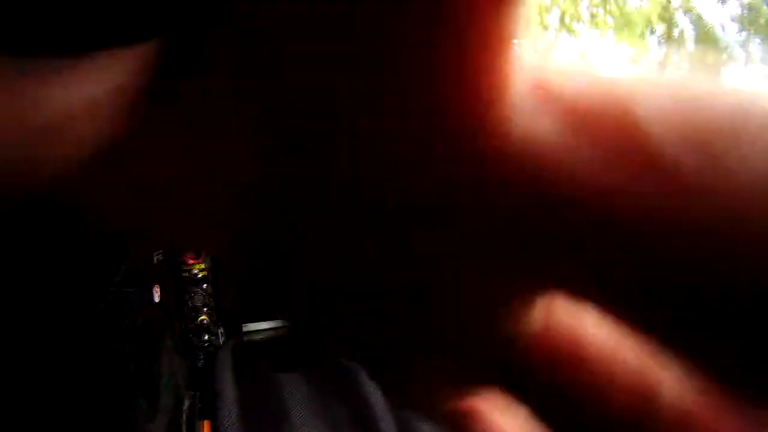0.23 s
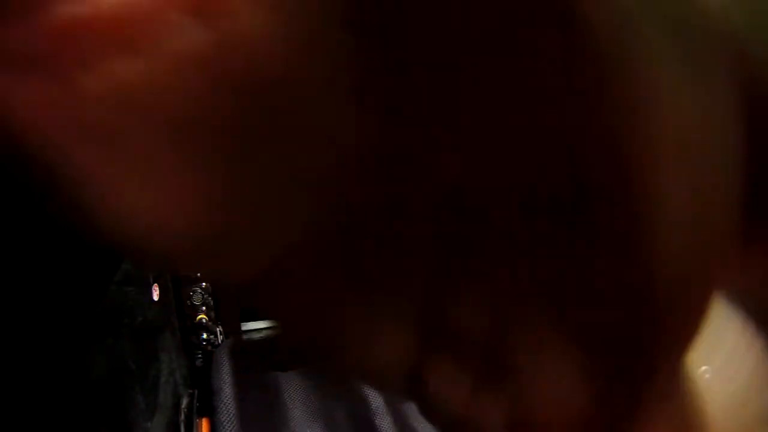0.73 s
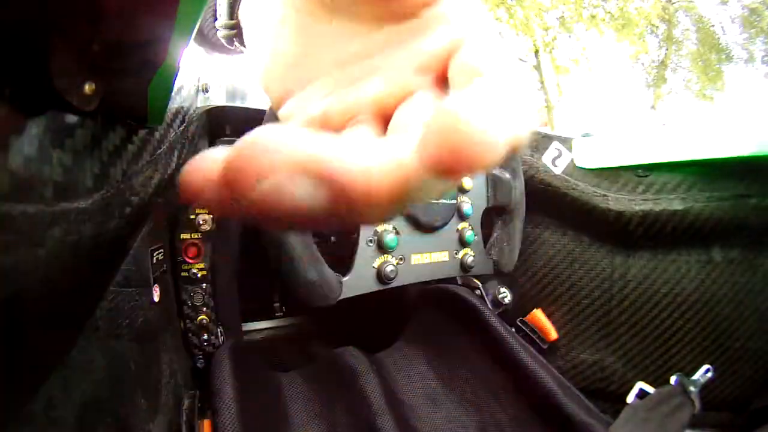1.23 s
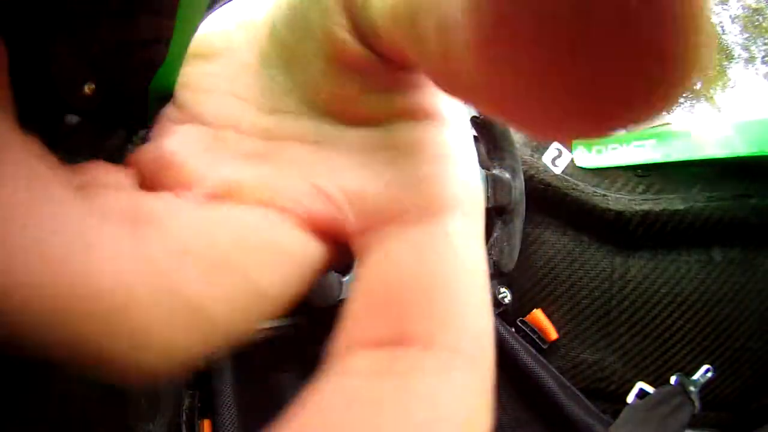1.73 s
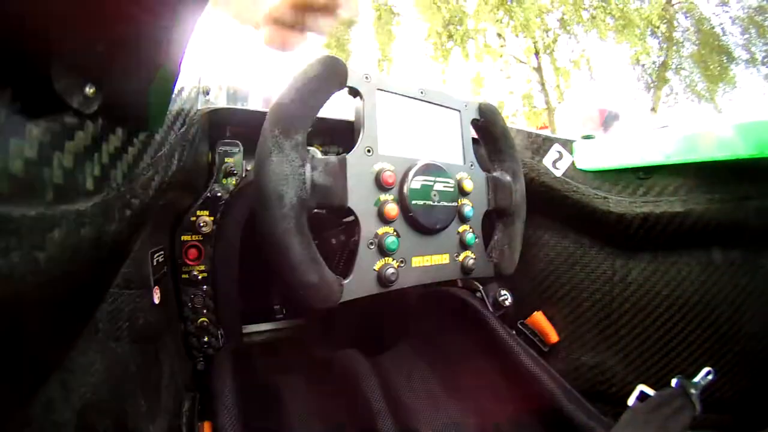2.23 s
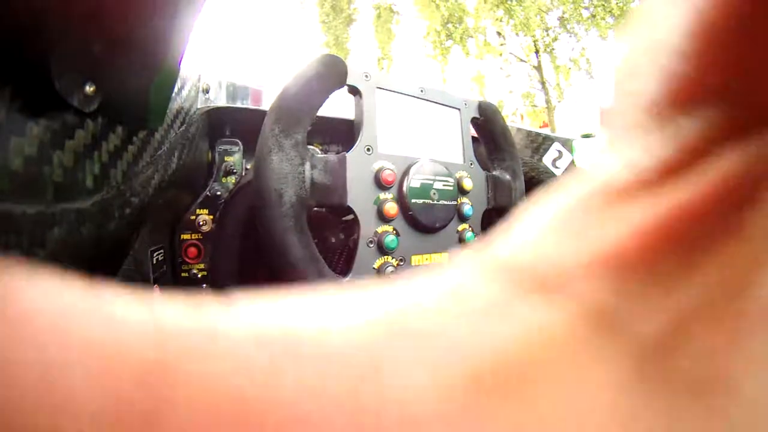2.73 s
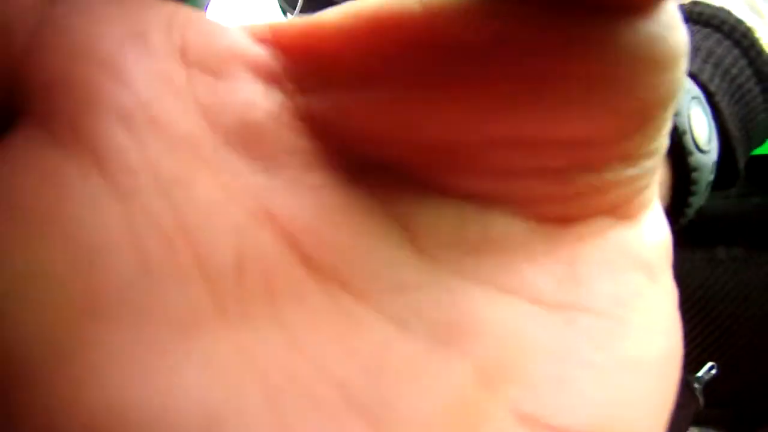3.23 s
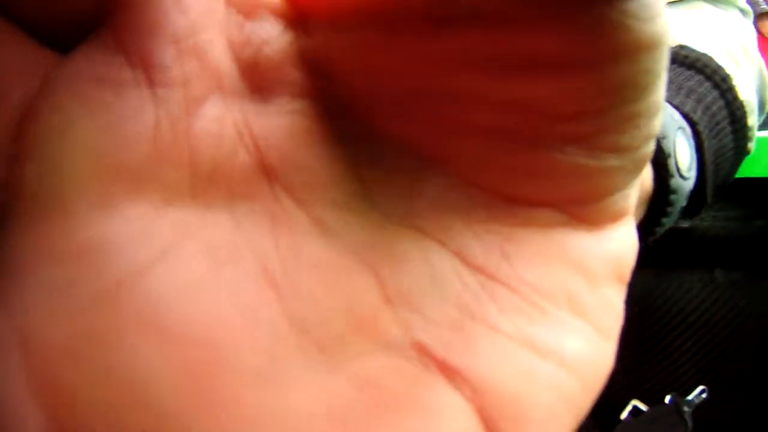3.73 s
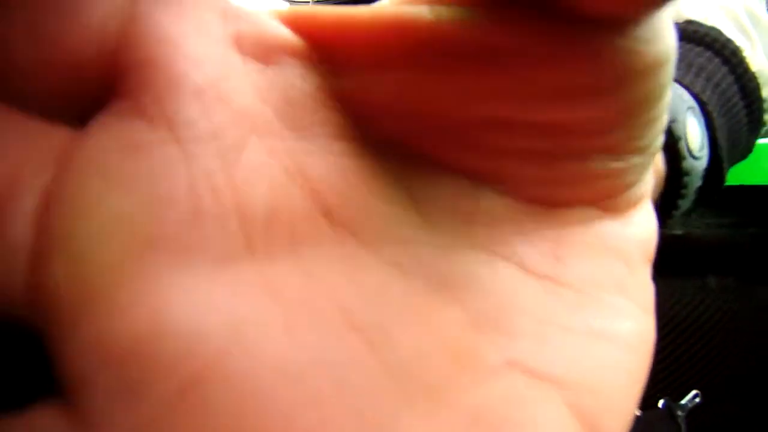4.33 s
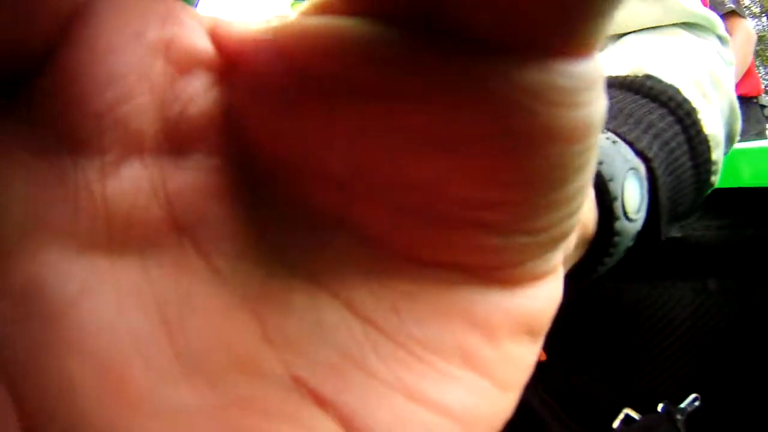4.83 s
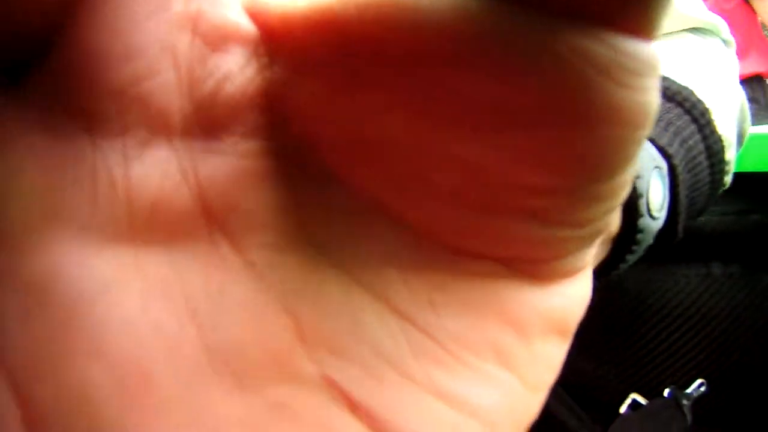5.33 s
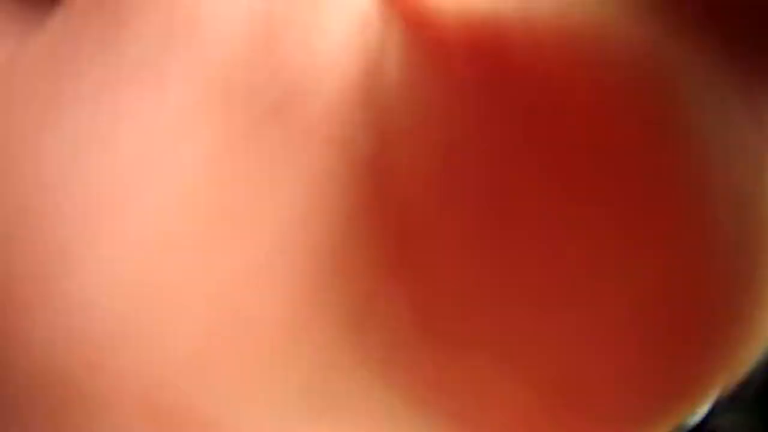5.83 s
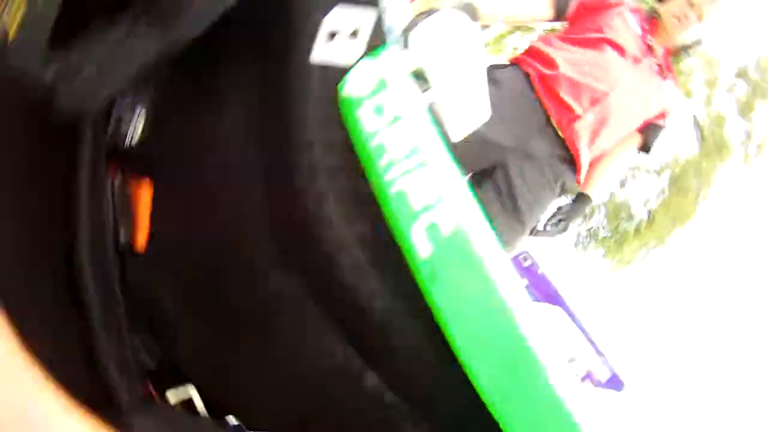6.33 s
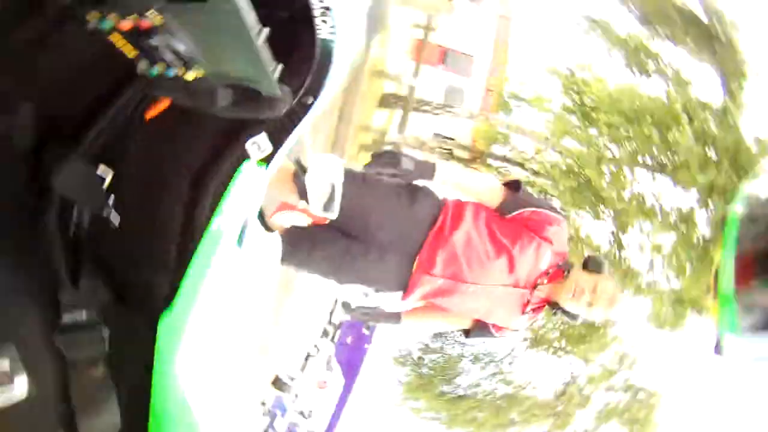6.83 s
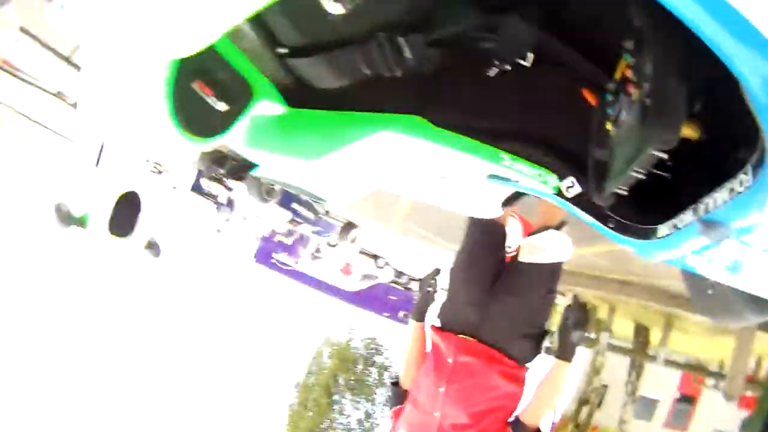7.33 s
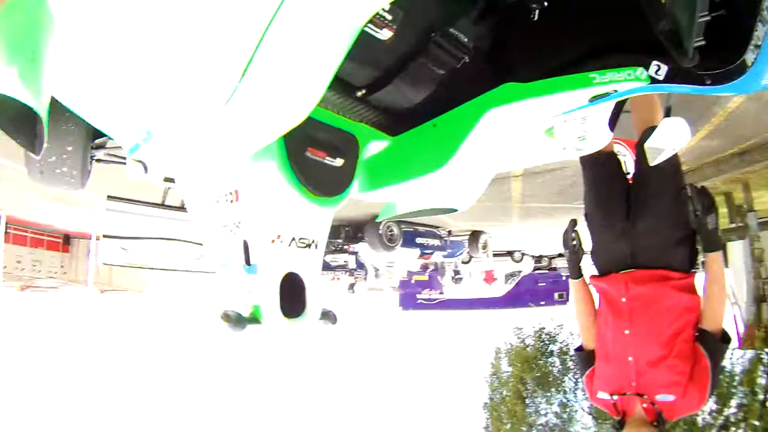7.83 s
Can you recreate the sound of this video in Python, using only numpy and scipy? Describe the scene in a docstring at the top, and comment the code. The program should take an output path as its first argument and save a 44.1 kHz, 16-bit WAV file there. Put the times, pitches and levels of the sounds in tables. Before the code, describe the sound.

A nearby engine idles throughout, a low hum and rumble wavering about once a second, at first carried through a small camera's mount in a car. Fingers handle the hollow plastic case right at the microphone, much louder than the engine. A sharp click and thump land at 0.3 seconds, followed by lighter ticks and a brief rub near 0.9. A deep thump comes at 2 seconds, then a bunch of loud clicks and scraping skin from 2.3 to 2.8. Separate clicks and soft bumps continue irregularly from 3.1 to 5.6 seconds. At 5.8 the camera unclips with the loudest cluster of snaps, a thump and a short scrape, briefly overloading. The engine then becomes quieter and thinner, heard through the air with a faint whine. Light rubs and ticks follow, with a soft clicking bump at 7.2, and the idle continues until about 8 seconds.

```python
"""Fingers click, shove and rub a small camera's hollow plastic case, unclip it and lift it out of a car.
Contacts ring the walls, rim, latch and, faintly, the mount bracket; shoves swing the microphone;
skin sticks and slips. An engine hunts at idle close by, heard first through the mount,
then more thinly by air. The loudest knocks overload the recorder."""
import sys
import numpy as np
from scipy import signal
from scipy.fft import rfft, irfft, next_fast_len
from scipy.io import wavfile
from scipy.ndimage import uniform_filter1d

SR = 44100
rng = np.random.default_rng(int(sys.argv[2]) if len(sys.argv) > 2 else 0)


def dump_mix(stems):
    """Bounce the given channels to the path in sys.argv[1] as a 16-bit WAV at rate SR."""
    frames = np.atleast_2d(stems).T  # one column per channel
    limited = np.clip(frames, -1, 1)  # hard clip at full scale
    pcm = np.round(limited * 32767).astype(np.int16)
    wavfile.write(sys.argv[1], SR, pcm)


N = 356556

# Short modes of the case walls, plus the mount bracket's faint long ring near 1100 Hz.
# Each row: frequency in Hz, relative level in dB, T60 in seconds.
WALL_AND_BRACKET_MODES = [(295, -9.5, 0.046), (580, -18, 0.032), (880, -6.5, 0.02), (1046, 3.5, 0.018),
                          (1230, -1.5, 0.033), (1450, 8, 0.017), (1632, -2.5, 0.025), (1746, 7.5, 0.013),
                          (2050, -5, .014), (1100, -51, 1.5)]
# Engine path. Each row: time in seconds, share arriving by air (0-1); the rest comes through the mount.
AIR_SHARE = [(0, 0.08), (5.8, 0.44), (5.95, 0.5), (8.09, 0.91)]
# Engine gains as grip and place change. Each row: time in seconds, then hum, rumble, roar and
# extra roar treble in dB.
ENGINE_GAINS = [(0, -36, -35.5, -40.5, 5.5), (.15, -37, -39, -44, 0.5), (.55, -38, -38, -42, 0),
                (1.2, -38, -37.5, -44, 1), (1.9, -37, -37, -41.5, -2), (2.55, -37.5, -36, -42, 3),
                (3.3, -35, -38, -40, -0.5), (4.2, -37, -38.5, -42.5, 2), (4.6, -35.5, -37, -41, -0.5),
                (5.1, -35.5, -38, -43, 0.5), (5.78, -37, -35.5, -40.5, -2), (5.93, -42.5, -45.5, -47, 4),
                (6.7, -45.5, -43.5, -47.5, 4.5), (7.05, -43, -41, -45.5, 4), (7.5, -43, -43.5, -45, 1.5),
                (8.09, -42.5, -43, -44, -6)]


def undb(db):
    return 10 ** (np.asarray(db) / 20)


def curve(table, column=1):
    """Table column, linearly interpolated over time."""
    table = np.array(table, float)
    return np.interp(np.arange(N) / SR, table[:, 0], table[:, column])


def colour(x, points):
    """Filter by (Hz, dB) points, -90 dB outside them; output rms 1."""
    hz, db = np.transpose(points)
    size = next_fast_len(N)
    log_hz = np.log(np.fft.rfftfreq(size, 1 / SR) + 1e-3)
    gain = undb(np.interp(log_hz, np.log(hz), db, left=-90, right=-90))
    y = irfft(rfft(x, size) * gain, size)[:N]
    return y / np.sqrt(np.mean(y ** 2))


def walk(rate_hz):
    """Random steps, smoothed twice; spread near 1."""
    hold = int(SR / rate_hz)
    steps = np.repeat(rng.standard_normal(N // hold + 1), hold)
    return 1.326 * uniform_filter1d(uniform_filter1d(steps, hold), hold)[:N]


def add(out, start_s, x):
    i = int(start_s * SR)
    out[i:i + len(x)] += x[:N - i]


def contact_ring(force, modes, peak_db, spot_hz=None):
    """A contact force rings damped modes, most strongly near the struck spot's pitch."""
    hz, db, t60_s = np.array(modes).T[:, :, None]
    t = np.arange(int(np.clip(t60_s.max() * SR, 2048, 16000))) / SR
    if spot_hz:
        db = db + np.maximum(-26 * np.abs(np.log2(hz / spot_hz)), -20)
    # Even out the drive per mode so all clicks sound like one body.
    drive = np.abs(np.sum(force[:1024] * np.exp(2j * np.pi * hz * t[:1024]), axis=1, keepdims=True))
    gain = undb(db) / (drive + 0.15 * drive.mean())
    onset = (1 - np.exp(-t / 0.00039)) ** 2
    response = onset * np.sum(gain * np.sin(2 * np.pi * hz * t) * 1000. ** (-t / t60_s), axis=0)
    ring = signal.fftconvolve(force, response)[:len(t)]
    return undb(peak_db) * ring / np.abs(ring).max()


def case_clicks():
    """Short rough contacts ring walls, bracket, rim and latch, with a thin crack on top."""
    # Contacts. Each row: start in seconds, contact time in ms, wall and bracket peak in dB,
    # spot pitch in Hz, then rim, latch and crack peaks in dB.
    contacts = [(0.265, 1, -26, 1760, -64, -47, -48), (0.2772, 0.5, 0.5, 1450, -14.5, -15, -37),
                (0.3, 1.1, -29, 1290, -40, -68, -64), (0.337, 1.3, -37, 1420, -31, -52, -60),
                (0.39, 0.75, -23.5, 1500, -49, -68, -58), (0.5, 0.79, -30, 1360, -57, -41, -50),
                (0.511, 3.7, -28.5, 1230, -50, -69, -66), (0.618, 1.7, -31, 1450, -50, -60, -75),
                (0.742, 1.7, -47, 1410, -41, -49, -56), (0.777, 6, -16.5, 1540, -38, -53, -70),
                (2.01, 0.67, -23, 835, -32, -45, -55), (2.227, 0.88, -28.5, 1460, -33, -45, -57),
                (2.312, 1.4, -16.5, 1300, -45, -50, -62), (2.354, 1.8, -3.5, 1790, -26, -10, -28),
                (2.38, 0.71, -4, 1260, -26, -19, -22), (2.445, 0.52, -15, 1480, -26, -18, -40),
                (2.519, 0.52, -43, 1850, -23.5, -48, -65), (2.583, 0.95, -14.5, 880, -35, -32, -63),
                (2.588, 1.2, -29, 1262, -35, -31.5, -40), (2.651, 2.2, -20.5, 1520, -45, -42, -52),
                (2.6617, 3.5, -14.5, 1440, -20, -31, -49), (2.717, 2.1, -35, 1340, -39, -47, -61),
                (2.813, 0.95, -45, 1500, -50, -35, -65), (2.821, 1.2, -25, 1810, -35, -52, -64),
                (3.1391, 0.91, -14, 1860, -15, -34, -48), (3.253, 1.2, -36, 1550, -33, -35, -59),
                (3.63, 1.53, -22, 1160, -21.5, -28.5, -58), (3.648, 1.35, -32, 1415, -36, -35, -61),
                (3.816, 0.65, -19.5, 1890, -19, -24.5, -43), (4.006, 0.78, -15.5, 1810, -14.5, -21.5, -43),
                (4.373, 2.1, -27, 1400, -34, -36, -59), (4.405, 2.04, -12.5, 1239, -25.5, -33, -43),
                (4.418, 1, -13, 1849, -37, -24.5, -47), (4.46, 0.71, -34, 1410, -56, -31.5, -53),
                (4.658, 0.9, -8.5, 1800, -17.5, -25, -52), (5.129, 0.91, -19, 2070, -21, -36, -64),
                (5.165, 0.52, -48, 1406, -44, -33, -59), (5.207, 0.75, -20, 1250, -62, -40, -62),
                (5.3325, 0.57, -14, 1810, -21.5, -27, -66), (5.577, 1.6, -25.5, 1450, -56, -49, -75),
                (5.767, 1.2, -20, 1280, -21, -41, -47), (5.78, 1.4, -12.5, 1520, -20, -29, -42),
                (5.7888, 0.42, -1.5, 1390, -9, -24, -34), (5.796, 0.6, -6, 1430, -21, -29, -28),
                (5.8005, 1.63, 7.5, 1020, -4, -3, -10.5), (5.82, 1.2, -36, 1714, -26, -37, -40),
                (5.8308, 0.95, -4.5, 1825, -22, -35, -44), (5.9036, 1.1, -15, 1340, -14, -34, -45),
                (6.19, 4.8, -35, 1017, -63, -66, -78), (6.276, 2, -32.5, 1300, -60, -62, -69),
                (6.387, 2.2, -32, 1290, -42, -42, -60), (6.53, 0.63, -47, 1450, -60, -47, -50),
                (6.869, 1.2, -34.5, 1400, -46, -43, -49), (7.209, 0.72, -25, 1450, -33, -44, -55),
                (7.214, 1.2, -28, 1800, -35, -50, -62), (7.221, 1, -30, 1960, -29, -38, -51),
                (7.228, 1.2, -30, 1410, -45, -57, -66), (7.561, 2, -30.5, 1584, -44, -55, -72)]
    # Modes of the stiff rim and the latch. Each row: frequency in Hz, relative level in dB, T60 in seconds.
    rim_modes = [(2297, 4.5, 0.011), (2805, -7.5, 0.019), (3150, 10.5, 0.0088), (3410, -6, 0.011)]
    latch_modes = [(3920, -2, 0.0064), (4400, 7.5, 0.0044), (4850, -8.5, 0.0072)]
    crack_band = np.vstack([signal.butter(3, 5200, "high", fs=SR, output="sos"),
                            signal.butter(1, 4000, fs=SR, output="sos")])
    out, t_ms = np.zeros(N), 1000 * np.arange(2048) / SR
    for start_s, contact_ms, wall_db, spot_hz, rim_db, latch_db, crack_db in contacts:
        age = t_ms / contact_ms
        force = rng.standard_normal(len(age)) * age * np.exp(-1.6 * age)
        crack = signal.sosfilt(crack_band, force)
        add(out, start_s, contact_ring(force, WALL_AND_BRACKET_MODES, wall_db, spot_hz))
        add(out, start_s, contact_ring(force, rim_modes, rim_db))
        add(out, start_s, contact_ring(force, latch_modes, latch_db))
        add(out, start_s, undb(crack_db) * crack / np.abs(crack).max())
    return out


def mic_thumps():
    """Each shove briefly swings the microphone."""
    # Shoves. Each row: start in seconds, level in dB, frequency in Hz, cycles, first swing (1 out, -1 in).
    shoves = [(0.2646, -12.5, 126, 1.5, -1), (.272, -11.5, 32, 0.71, 1), (1.987, -18, 75, 1.24, -1),
              (2.005, -1, 68, 0.77, -1), (2.013, -4, 39.5, 0.75, 1), (2.364, -12.5, 52, 1.1, 1),
              (2.718, -17, 41, 1.13, 1), (2.825, -19.5, 22, 0.84, -1), (3.101, -18.5, 18, 0.7, 1),
              (3.173, -20, 14, 0.72, -1), (3.269, -14, 21, 0.68, 1), (3.629, -17.5, 200, 1.3, -1),
              (3.649, -18.5, 93, 0.97, 1), (4, -17.5, 26, 0.62, -1), (4.404, -8.5, 45, 1.66, -1),
              (5.577, -16, 120, 1.5, 1), (5.766, -20, 78, 0.96, 1), (5.78, -14, 120, 2.6, 1),
              (5.7896, 1.5, 145, 0.85, -1), (5.791, -6.5, 48, 0.56, 1), (5.811, -18, 9.5, 1.77, 1),
              (7.204, -12, 59.7, .9, -1), (7.2146, -15, 77, 0.38, -1), (7.218, -14, 28, 0.62, 1)]
    out = np.zeros(N)
    for start_s, level_db, hz, cycles, polarity in shoves:
        turns = np.arange(0, cycles, hz / SR)
        envelope = np.sin(np.pi * turns / cycles) ** 0.52 * np.exp(-0.59 * (turns / cycles - .5))
        add(out, start_s, polarity * undb(level_db) * envelope * np.sin(2 * np.pi * turns))
    return out


def finger_rubs():
    """Stick-slip grains of skin excite the walls, the rim and a bright hiss."""
    # Strokes. Each row: time of full level, swell, hold and fade in seconds, hiss level in dB,
    # then walls and rim in dB relative to the hiss.
    strokes = [(.325, 0.09, .012, .02, -68, 10, 6), (.86, 0.087, .015, .04, -57, 17, 7),
               (0.949, .02, 0.0018, .04, -64.5, 27, 9), (2.007, 0.028, .002, .05, -65.5, 24, 11),
               (2.157, 0.091, 0.019, .12, -60.5, 12.5, 0), (2.225, .03, .005, .04, -74, 18, 5),
               (2.351, 0.026, 0.0056, .02, -37.5, 30.5, 11), (2.37, 0.012, 0.0033, .03, -37, 16, 7),
               (2.423, 0.083, 0.013, 0.063, -46, 21.5, 16), (2.722, 0.058, .002, .07, -64, 24, 9),
               (2.81, 0.045, .002, .012, -63, 20, 8), (3.257, 0.014, .002, .005, -53, 16.5, 17),
               (5.78, .07, .004, .01, -58, 24.5, 15.5), (5.803, 0.017, 0.0023, .008, -31, 26.5, 5.5),
               (6.395, 0.031, .004, .035, -63.5, 27, 12.5), (6.446, 0.053, 0.078, .02, -68, 15, 11),
               (6.6, .05, 0.0021, .02, -67, 21, 6), (6.98, .25, 0.19, .2, -76.5, 5, 16)]
    # Friction spectra. Each row: frequency in Hz, relative density in dB.
    wall_spectrum = [(71, -34), (120, -3.5), (231, -11), (418, -6.5), (871, -7.5), (1260, -3), (1510, -5),
                     (1740, -1), (2170, -12), (2600, -18.5), (3380, -40), (5720, -120)]
    rim_spectrum = [(1530, -34), (2600, -4.5), (2810, -4), (3040, -9.5), (4340, 1), (5300, -16),
                    (6890, -56), (11700, -120)]
    hiss_spectrum = [(4500, -16), (5500, 0.5), (7000, 5), (9300, -9), (16000, -23.5)]
    ramp_db = 20  # per swell or fade time
    grains = rng.standard_normal(N) * undb(2.0 * walk(250) + 1.1 * walk(70))
    walls, rim, hiss = (colour(grains, shape) for shape in (wall_spectrum, rim_spectrum, hiss_spectrum))
    out, t = np.zeros(N), np.arange(N) / SR
    for full_s, swell_s, hold_s, fade_s, hiss_db, wall_db, rim_db in strokes:
        span = slice(int(max(full_s - 3 * swell_s, 0) * SR), int((full_s + hold_s + 3 * fade_s) * SR))
        ramps = np.maximum((full_s - t[span]) / swell_s, (t[span] - full_s - hold_s) / fade_s)
        envelope = undb(hiss_db - ramp_db * np.maximum(ramps, 0))
        out[span] += envelope * (hiss[span] + undb(wall_db) * walls[span] + undb(rim_db) * rim[span])
    return out


def mount_to_air(noise, air, mount_spectrum, air_spectrum):
    """Equal-power crossfade between the paths; reversing the noise decorrelates them."""
    through_mount = np.sqrt(1 - air) * colour(noise, mount_spectrum)
    return through_mount + np.sqrt(air) * colour(noise[::-1], air_spectrum)


def engine_hum(firings, air, shake):
    """Firing harmonics, wavering in level and phase."""
    # Harmonics. Each row: multiple of the firing rate, relative level in dB by mount, then by air.
    harmonics = [(1, 2, -0.5), (2, -3.5, -1), (3, -0.5, -7.5), (4, -5.5, -7), (5, -20, -10),
                 (6, -8.5, -10.5), (7, -18.5, -24.5)]
    hum = np.zeros(N)
    for k, mount_db, air_db in harmonics:
        level_db = mount_db + air * (air_db - mount_db) + 2.94 * shake * walk(9)
        turns = k * firings + rng.random() + .06 * shake * walk(13)
        hum += undb(level_db) * np.sin(2 * np.pi * turns)
    return undb(curve(ENGINE_GAINS)) * hum


def engine_rumble(air):
    """Broad low noise between the hum lines."""
    # Rumble spectra by path. Each row: frequency in Hz, relative density in dB.
    mount_spectrum = [(30, -25), (60, -2), (110, 7.5), (200, -6.5), (290, -3.5), (370, -18), (600, -16),
                      (900, -29.5)]
    air_spectrum = [(30, -7.5), (60, 0), (110, -26), (200, -17), (275, -7), (370, -22.5), (600, -35.5),
                    (900, -45.5)]
    rumble = mount_to_air(rng.standard_normal(N), air, mount_spectrum, air_spectrum)
    return undb(curve(ENGINE_GAINS, column=2)) * rumble


def engine_roar(firings, firing_hz, air):
    """Upper noise: puffs once per firing, grainy from rattling parts, louder at higher speed."""
    # Roar spectra inside the closed case, by path. Each row: frequency in Hz, relative density in dB.
    mount_spectrum = [(290, -4.5), (500, -15), (949, -14), (1210, -2.5), (1310, -1.5), (1425, 3),
                      (1580, -1.5), (1740, -6), (1980, -4.5), (2690, -21), (3180, -18.5), (3500, -27),
                      (4360, -20), (5040, -33), (5220, -57), (9000, -66), (11700, -83), (19800, -120)]
    air_spectrum = [(290, -59), (500, -10), (547, -35), (766, -27), (980, -10.5), (1060, -6), (1350, -8),
                    (1920, -2.5), (2100, -8), (2390, -10), (3060, -13), (3660, -30), (4510, -19),
                    (5840, -35), (11000, -52), (14300, -73), (22000, -120)]
    mid_idle_hz, db_per_hz = 46.4, 0.3
    puff = 1 + 0.12 * np.cos(2 * np.pi * firings)
    grains = rng.standard_normal(N) * puff * undb(1.1 * walk(25) + 1.3 * walk(150))
    roar = mount_to_air(grains, air, mount_spectrum, air_spectrum)
    treble = signal.sosfiltfilt(signal.butter(3, 3500, "high", fs=SR, output="sos"), roar)
    roar += (undb(curve(ENGINE_GAINS, column=4)) - 1) * treble
    return undb(curve(ENGINE_GAINS, column=3) + db_per_hz * (firing_hz - mid_idle_hz)) * roar


def engine_whine(air):
    """Thin steady-pitched tones that emerge as the camera comes free."""
    # Airborne tones. Each row: frequency in Hz, mean level in dB at an air share of 1.
    tones = [(2093, -51.5), (2030, -60.5), (260, -53), (55, -46)]
    t = np.arange(N) / SR
    return air * sum(undb(db + 0.91 * walk(2.57)) * np.sin(2 * np.pi * hz * t) for hz, db in tones)


def engine():
    """The idle hunts about once a second; uneven firings swell and dip the bass."""
    # Turning points of the idle. Each row: time in seconds, firing rate in Hz.
    idle = [(0, 46.6), (.26, 43.6), (.6, 49), (1.18, 44.8), (1.6, 48.5), (2.12, 44.8), (2.52, 49),
            (3.04, 45.1), (3.4, 49.2), (3.92, 44.3), (4.55, 49.3), (4.9, 42.8), (5.45, 49.4), (5.83, 43.8),
            (6.37, 48.8), (6.81, 43.9), (7.18, 48), (7.6, 43.4), (8.09, 48.4)]
    turn_s = .1
    firing_hz = uniform_filter1d(curve(idle), int(turn_s * SR))
    firings = np.cumsum(firing_hz * (1 + 0.01166 * walk(20))) / SR
    air = curve(AIR_SHARE)
    shake = 1 - 0.9 * air  # a hand on the mount unsteadies the hum
    bass = engine_hum(firings, air, shake) + engine_rumble(air)
    roar, whine = engine_roar(firings, firing_hz, air), engine_whine(air)
    return undb(2.3 * shake * walk(18)) * bass + roar + whine


def mount_rattle():
    """Engine shake ticks the case walls faintly against the mount."""
    ticks_per_s, gain_db = 60, -43
    hits = rng.random(N) < ticks_per_s / SR
    impulses = hits * undb(3.0 * rng.standard_normal(N)) * rng.choice([-1, 1], N)
    t = np.arange(1024) / SR
    ring = sum(undb(db) * np.sin(2 * np.pi * hz * t) * 1000. ** (-t / t60_s)
               for hz, db, t60_s in WALL_AND_BRACKET_MODES)
    tick = ring * (1 - np.exp(-t / 0.0022))
    return undb(gain_db) * signal.fftconvolve(impulses, tick)[:N] * (1 - curve(AIR_SHARE))


def hand_sway():
    """The hand rocks the microphone at the edge of hearing."""
    # Sway strength. Each row: time in seconds, mean level in dB.
    levels = [(0, -39), (.2, -32), (.45, -46), (1, -54), (1.45, -60), (1.95, -46), (2.08, -28), (2.43, -37),
              (3.15, -27), (3.75, -28), (4.3, -26), (4.95, -28), (5.85, -34), (6.03, -24.5), (6.28, -43.5),
              (6.46, -32), (7, -54), (7.36, -41), (8.09, -46)]
    sway = colour(rng.standard_normal(N), [(6, -8.0), (15, 7.0), (30, -4.0), (50, 2.5), (90, -28.0)])
    return sway * undb(curve(levels) + 2.9 * walk(2.01))


def scene():
    return (engine() + mount_rattle() + hand_sway() + case_clicks() + mic_thumps() + finger_rubs())[None]


def record(dry):
    """Preamp hiss, hard overload on the big knocks, steep top cut."""
    hiss_db, ceiling, top_hz = -78, .7, 15750
    clipped = np.clip(dry + undb(hiss_db) * rng.standard_normal(dry.shape), -ceiling, ceiling)
    return signal.sosfilt(signal.ellip(8, .2, 70, top_hz, fs=SR, output="sos"), clipped)


dry = scene()
out = record(dry)
dump_mix(out)
```